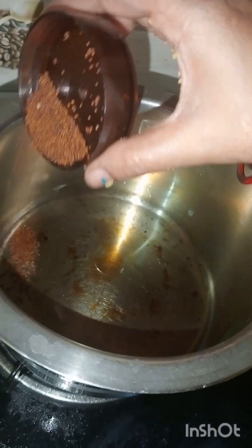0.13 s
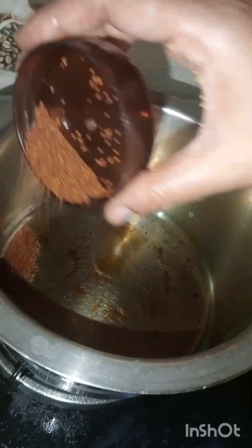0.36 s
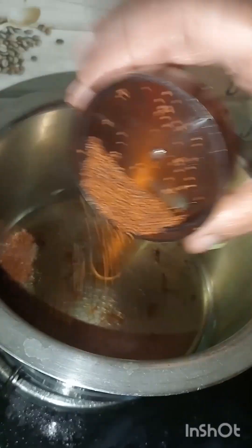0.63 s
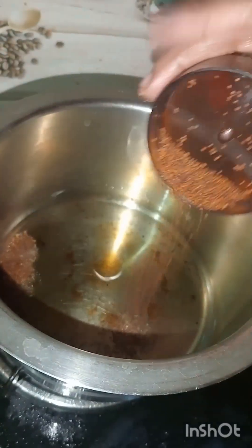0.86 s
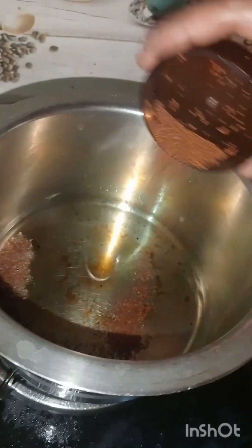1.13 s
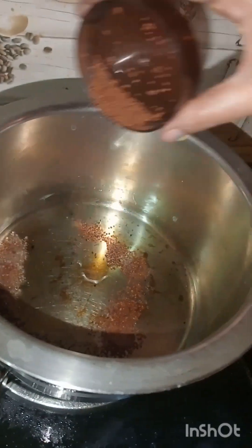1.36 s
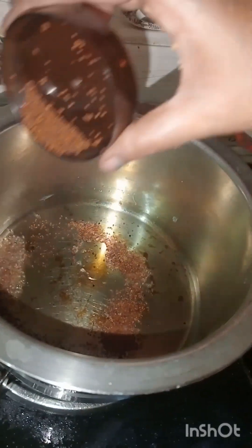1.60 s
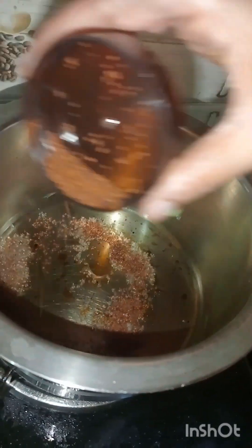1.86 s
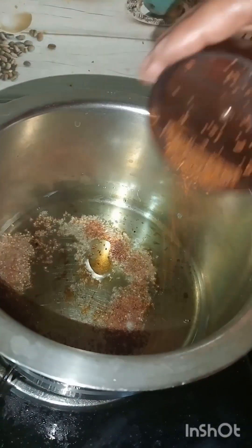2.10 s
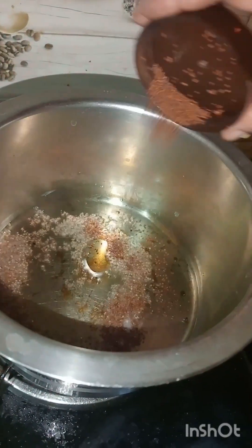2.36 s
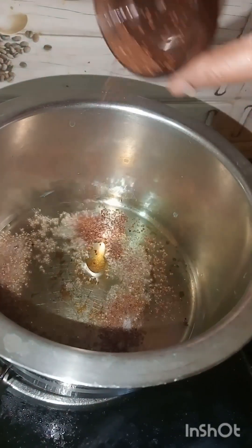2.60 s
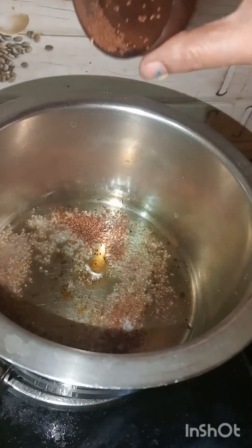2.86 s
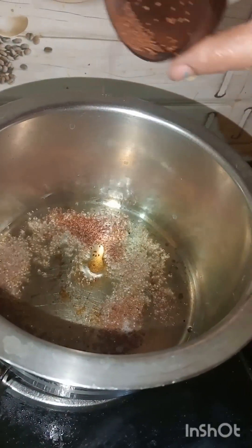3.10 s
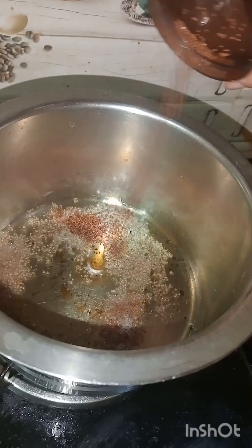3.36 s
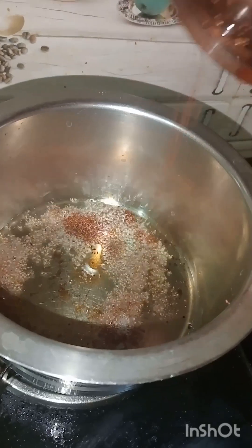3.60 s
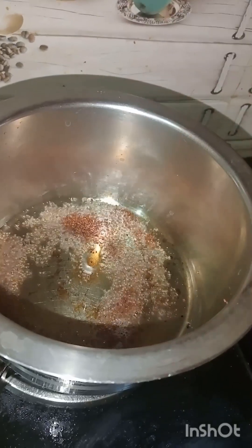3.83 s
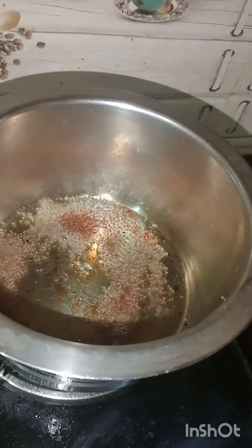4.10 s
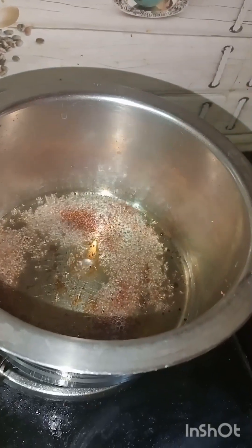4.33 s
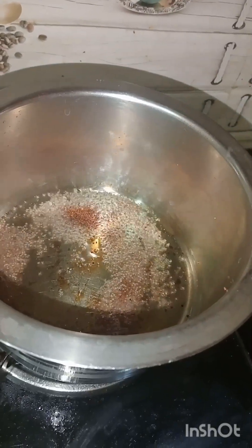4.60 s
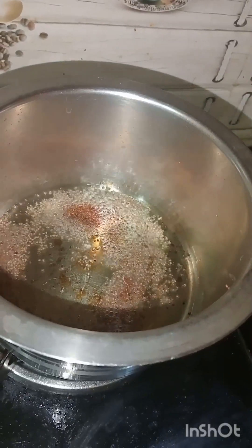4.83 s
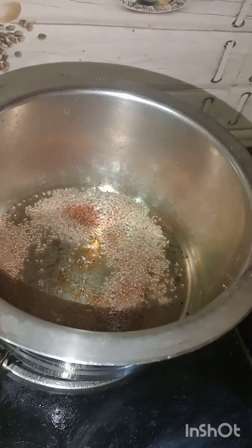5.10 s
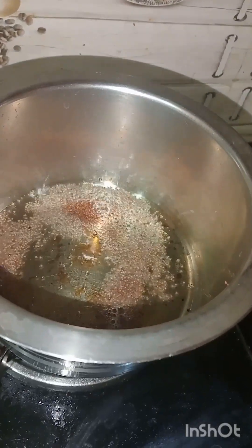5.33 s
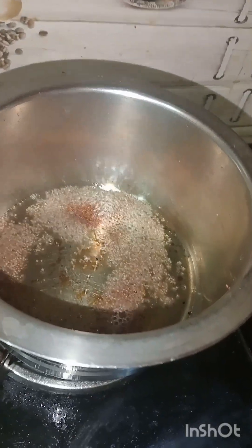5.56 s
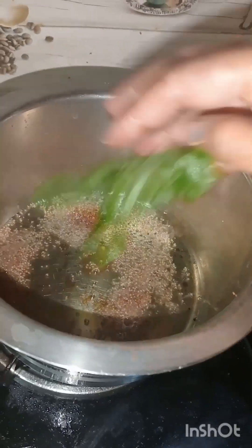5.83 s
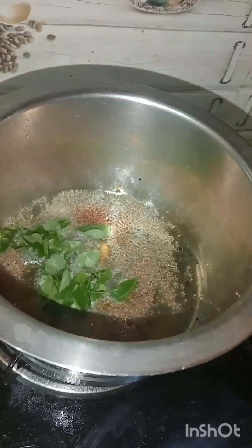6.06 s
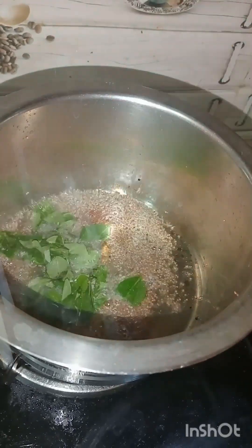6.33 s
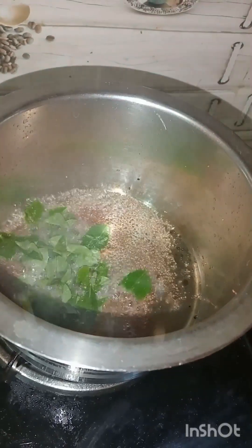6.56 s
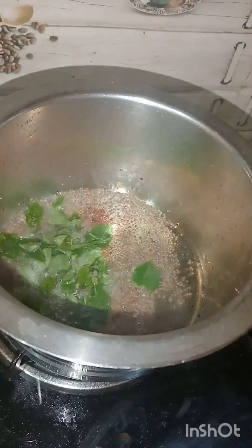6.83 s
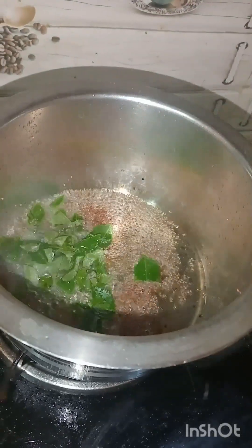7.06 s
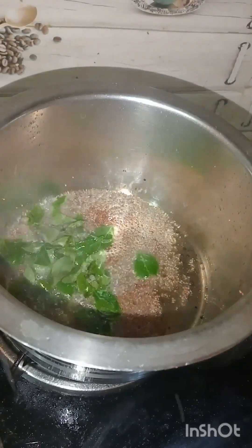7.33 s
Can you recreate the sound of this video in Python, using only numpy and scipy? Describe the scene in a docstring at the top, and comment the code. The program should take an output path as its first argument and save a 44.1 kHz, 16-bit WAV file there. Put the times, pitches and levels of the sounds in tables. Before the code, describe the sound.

Close over a deep steel pot in a kitchen, small seeds rustle and tick in a shaken bowl as they are poured into hot oil. Sparse pops soon become a rapid, sharp crackle over fine fizzing, some with low thumps. The bowl knocks on the counter midway. Near six seconds wet leaves slap in, and a loud dense sizzle with hard spitting takes over to the end. Bright, close phone microphone.

```python
"""A kitchen, close over a deep steel pot: seeds fizz and pop in hot oil, then wet leaves slap in and sizzle densely.
Steam bursts are puffs of noise at random moments; sizzle, gurgle and cracks ring the pot, fizz and hiss the
microphone port. Seeds rustle and patter in a small bowl as dense ticks, and the bowl knocks on the counter.
Low thumps under some of the pops are a sharp dip, a slow lobe and a short slap; one soft tone glides up.
Coloured noise and an unsteady low drone lie underneath."""
import sys
import numpy as np
from scipy import signal
from scipy.fft import rfft, irfft
from scipy.io import wavfile
from scipy.ndimage import uniform_filter1d

SR = 44100
rng = np.random.default_rng(int(sys.argv[2]) if len(sys.argv) > 2 else 0)


def gain_from_db(level_db):
    """Convert decibel levels to linear amplitude factors (20 dB per decade)."""
    decades = np.asarray(level_db, float) / 20
    return 10 ** decades


def unload_wav(signal):
    """Save mono or channel-first audio to the path in sys.argv[1] as 16-bit WAV at rate SR, clipped to [-1, 1]."""
    wavfile.write(
        sys.argv[1],
        SR,
        np.round(np.clip(np.atleast_2d(signal).T, -1, 1) * 32767).astype(np.int16),
    )


N = 328104

# colour of the kitchen air and burner noise: f/Hz, relative level per Hz/dB
KITCHEN_COLOUR = [(18, -46), (30, -3), (108, 6.5), (325, 2.5), (411, 2.5), (720, -6), (976, 0), (2430, 0),
                  (7120, -0.5), (8000, -6), (10400, -38), (17600, -120)]
# swells of the low drone: middle t/s, half length/s, level/dB
DRONE_SWELLS = [(.05, 0.13, -54), (2.2, 0.23, -56), (4.5, 0.28, -54.5), (6.5, 0.69, -47.5), (7.2, .15, -55)]
# bowl knocking on the counter: t/s, level/dB, clatter decay/s, upper modes against the low one/dB
BOWL_KNOCKS = [(4.4318, -21.5, 0.012, -10), (4.6094, -32.5, 0.014, 10), (4.677, -32, 0.02, 7.5),
               (4.717, -33.5, 0.036, 2.5)]
# modes of the knocked bowl, lowest first: f/Hz, width/Hz, level/dB
BOWL_MODES = [(1450, 55, 4), (2350, 150, -4), (2560, 140, -1), (6000, 95, -2)]
# shakes of the seed bowl: middle t/s, half length/s, patter level/dB, low rustle level/dB, high rustle level/dB
BOWL_SHAKES = [(.06, 0.17, -43, -49, -70), (.27, 0.093, -39.5, -47, -61), (.45, 0.15, -42, -44.5, -47.5),
               (.64, .1, -40.5, -50, -53), (.78, .1, -48, -47, -66), (.94, 0.44, -41, -52, -52),
               (1.37, 0.12, -36, -43.5, -44), (1.72, 0.063, -36, -50, -52), (2.12, 0.74, -43, -47.5, -50),
               (2.36, 0.32, -42, -52, -39), (2.9, 0.21, -38, -46.5, -44.5), (3.02, 0.11, -45, -67, -40)]
# resonances in the hollow of the seed bowl: f/Hz, width/Hz, level/dB
BOWL_HOLLOW = [(2100, 930, 5), (2570, 59, 3)]
# resonances of its rim: f/Hz, width/Hz, level/dB
BOWL_RIM = [(4860, 970, -7), (5450, 73, 3.5)]
# low thumps under some of the pops: t/s, level/dB
THUMPS = [(2.673, -26), (2.996, -31), (3.203, -28.5), (3.237, -37), (3.472, -24.5), (3.483, -20),
          (3.553, -34), (3.608, -31), (3.692, -23.5), (3.921, -30.5), (4.065, -30.5), (4.152, -30),
          (4.299, -26.5), (4.312, -22), (4.357, -28.5), (4.503, -23), (4.909, -30.5), (5.053, -38),
          (5.177, -33), (5.265, -26.5), (5.348, -27.5), (5.377, -32), (5.417, -34), (5.435, -24.5),
          (5.526, -24.5), (5.739, -25), (5.768, -36), (5.788, -32.5), (5.844, -39), (5.862, -34),
          (6.047, -20.5), (7.087, -29)]
# seeds frying between the pops: t/s, fine fizz level/dB, coarse sizzle level/dB
SEED_FRY = [(0.0, -57, -54), (0.45, -57, -52.5), (0.89, -44.5, -62.5), (1.25, -53.5, -57.5),
            (1.8, -45.5, -47), (2.3, -43.5, -45.5), (3.1, -42, -50.5), (3.61, -37.5, -44.5),
            (3.96, -44, -47), (4.23, -35.5, -44.5), (4.53, -38, -38.5), (4.75, -47, -46), (5.0, -41.5, -44),
            (5.4, -36.5, -47), (5.75, -47, -56.5), (6.03, -31.5, -34.5)]
# leaves in the oil; rows for fizz, sizzle, gurgle: lasting level/dB, level at first against it/dB
LEAF_FRY = [(-31.5, -20), (-24.5, 4.5), (-43.5, 10)]
# seeds bursting and drops spitting: t/s, level/dB, crack against it/dB, crack f/Hz, t60 of the spattering/s
SEED_POPS = [(0.6797, -19, -39, 3420, 0.12), (0.7924, -34, -25, 2480, 0.12), (0.8762, -33, -22, 5450, 0.12),
             (1.1617, -28.5, -18, 4870, 0.14), (1.3282, -28, -14, 5310, 0.12),
             (1.4792, -21, -16.5, 2630, 0.13), (1.5174, -22.5, -16, 5290, 0.11),
             (1.62, -25.5, -9, 4430, 0.096), (1.6671, -14, -11.5, 2480, 0.11),
             (1.6892, -10.5, -19, 4060, 0.098), (1.7245, -17.5, -11.5, 4050, 0.1),
             (1.7574, -11.5, -7, 6260, 0.092), (1.7964, -7, -10.5, 4040, 0.18),
             (1.855, -17, -16, 4510, 0.15), (1.925, -23, -14, 5450, 0.11), (1.9642, -33, -6, 5450, 0.12),
             (1.9814, -21.5, -21, 5320, 0.12), (2.0091, -19.5, -11, 5170, 0.12),
             (2.0618, -18, -28, 6170, 0.13), (2.1094, -12, -14, 5650, 0.16),
             (2.1605, -7, -12.5, 6040, 0.11), (2.2543, -13.5, -28, 4160, 0.12),
             (2.2773, -4.5, -16.5, 3260, 0.08), (2.3407, -6, -8.5, 4860, 0.18),
             (2.3761, -9, -7.5, 4570, 0.17), (2.4646, -23, -6.5, 5900, 0.14),
             (2.5265, -25, -18, 5320, 0.11), (2.5764, -19, -21, 5500, 0.13), (2.5937, -17, -15, 6160, 0.21),
             (2.6302, -10.5, -16, 3870, 0.14), (2.6633, -6, -16.5, 2630, 0.12),
             (2.8213, -14, -16, 5860, 0.12), (2.8574, -22, -11, 5590, 0.12), (2.886, -23, -4.5, 6400, 0.12),
             (2.9, -17, -20, 4720, 0.12), (2.9206, -10.5, -10.5, 5800, 0.11),
             (2.9714, -4.5, -14.5, 6160, 0.098), (2.9954, -11, -15, 5370, 0.081),
             (3.0328, -5, -17, 4010, 0.15), (3.126, -29, -23, 4030, 0.12), (3.151, -36, -15, 6150, 0.12),
             (3.176, -14.5, -13, 4800, 0.12), (3.1979, -9.5, -16, 6200, 0.13),
             (3.2197, -8.5, -14.5, 6370, 0.24), (3.2633, -8.5, -11, 2620, 0.11),
             (3.4007, -5, -11.5, 5170, 0.17), (3.4509, -6.5, -14, 5030, 0.26),
             (3.4792, -4, -13.5, 3200, 0.068), (3.5511, -9.5, -13.5, 5150, 0.1),
             (3.608, -6, -12.5, 5000, 0.15), (3.669, -19.5, -12.5, 5300, 0.13),
             (3.6905, -6.5, -18, 4800, 0.11), (3.7288, -15, -7, 5230, 0.14), (3.7498, -8, -15, 4890, 0.12),
             (3.8058, -15.5, -5.5, 4100, 0.082), (3.8484, -26, -12, 4060, 0.12),
             (3.8864, -10, -13.5, 4240, 0.063), (3.9197, -7, -17, 2620, 0.1), (3.9977, -9, -7, 5000, 0.12),
             (4.046, -6, -15, 4050, 0.35), (4.1105, -8.5, -14.5, 2820, 0.12),
             (4.1498, -2.5, -14.5, 5100, 0.1), (4.2167, -2, -19, 4830, 0.14),
             (4.2718, -18, -12.5, 4000, 0.12), (4.296, -6, -17, 3250, 0.15),
             (4.3564, -6.5, -17, 3240, 0.064), (4.3863, -9, -14.5, 4010, 0.11),
             (4.4246, -3, -9.5, 5730, 0.1), (4.4525, -10, -13, 5170, 0.084),
             (4.5019, -2.5, -15.5, 2500, 0.12), (4.5393, -11.5, -13, 4060, 0.16),
             (4.6072, -8, -8, 6090, 0.26), (4.6586, -13.5, -10, 5730, 0.12),
             (4.675, -11.5, -5.5, 2680, 0.15), (4.715, -2, -12, 6200, 0.098),
             (4.8162, -28, -21, 6150, 0.12), (4.8676, -14, -11.5, 5300, 0.08),
             (4.907, -5.5, -14, 3260, 0.12), (4.9273, -5, -18, 3250, 0.21), (4.9688, -16, -8.5, 4970, 0.12),
             (5.0508, -5.5, -13.5, 3260, 0.11), (5.111, -15, -15.5, 5100, 0.1),
             (5.128, -1.5, -13.5, 5000, 0.16), (5.1705, -6.5, -13.5, 6400, 0.18),
             (5.2408, -33, -30, 5370, 0.11), (5.265, -6.5, -18, 4040, 0.12),
             (5.316, -8.5, -15.5, 4020, 0.13), (5.346, -7, -16, 3300, 0.076), (5.3764, -5, -20, 2890, 0.16),
             (5.415, -13.5, -13, 3280, 0.11), (5.4356, -5, -15.5, 6400, 0.12),
             (5.492, -13, -17, 4070, 0.36), (5.5274, -5, -15, 3270, 0.14), (5.591, -4, -17, 3940, 0.16),
             (5.6298, -12.5, -16, 4000, 0.21), (5.7387, -4.5, -20, 3260, 0.075),
             (5.7653, -14, -17, 4020, 0.12), (5.7865, -11, -18, 4050, 0.11), (5.8416, -3, -16.5, 5100, 0.1),
             (5.8606, -9.5, -13, 4970, 0.12), (5.9172, 0, -14, 5060, 0.058), (5.9496, -9, -16, 4100, 0.084),
             (6.004, -12, -14.5, 3940, 0.15)]
# the loudest spits of the wet leaves: t/s, level/dB, crack f/Hz
LEAF_SPITS = [(6.0485, -15, 3250), (6.0623, -8, 3900), (6.0818, -1, 2910), (6.1128, 1.5, 3940),
              (6.1523, -5, 3760), (6.1814, -4, 4650), (6.2132, -5, 2930), (6.2327, -2, 3220),
              (6.2509, 0, 3300), (6.2986, -13, 3240), (6.3175, -9, 2930), (6.3387, -6, 3220),
              (6.3539, -7, 2550), (6.3807, -6.5, 2450), (6.406, -11, 2450), (6.4665, -7, 3000),
              (6.4867, -23, 4100), (6.5084, -7.5, 3400), (6.5419, -21, 2440), (6.5558, -9, 3030),
              (6.5902, -6, 2470), (6.637, -19, 3190), (6.6895, -8, 3450), (6.7183, -16, 3400),
              (6.7393, -5, 2500), (6.7589, -6, 5180), (6.7962, -12.5, 3000), (6.8486, -0.5, 2880),
              (6.9075, -2.5, 5600), (6.9458, -9, 2670), (6.9658, -6.5, 2510), (6.9962, -11, 2570),
              (7.0242, -7.5, 3000), (7.1154, -1, 5800), (7.1715, -18, 3230), (7.1883, -18, 2450),
              (7.2105, -2.5, 4140), (7.2314, -5.5, 3400), (7.2922, -16, 2460), (7.303, -13, 4100),
              (7.3687, -14, 3180), (7.381, -7.5, 2960)]
# resonances of the pot, its air and walls: f/Hz, width/Hz, level/dB
POT_MODES = [(566.4, 14, 5.5), (756, 127, 10), (1370, 61, 6.5), (1586, 122, 10), (1942, 44, 3.5),
             (2450, 81, 2.5), (2910, 30, -9), (3260, 275, -3.5), (3760, 43, -26), (4070, 123, -1),
             (5000, 1780, -1.5), (5950, 460, -11.5)]
# resonances of the microphone port: f/Hz, width/Hz, level/dB
MIC_PORT = [(9730, 530, -71), (9760, 390, 0.5), (10100, 4800, -4)]

KITCHEN_DB = -48
DRONE_HZ, OCTAVE_DB, DRONE_REST_DB = 154, -8.5, -66
COO_MIDDLE_S, COO_LENGTH_S, COO_DB = 4.255, 0.09, -46
COO_FROM_HZ, COO_TO_HZ, COO_UPPER_RATIO = 265, 320, 1.6
LANDING_DB, LANDING_DECAY_S = -20, 0.0044
SLAP_DB = -0.5  # against the dip and lobe of a thump
SEED_GURGLE_DB = -63
LEAVES_S, LEAVES_RISE_S, LEAVES_SETTLE_S = 6.05, 0.031, 0.37
SPIT_CRACK_DB, SPIT_T60_S = -8.5, 0.12
BRIGHT_FROM_S, EARLY_DULL = 2.55, 0.45  # earlier pops get this share less of the top band in their hiss
ROOM_T60_S, ROOM_DB = 0.14, -10
TOP_HZ = 15400


def unit(x):
    """Scale to rms 1."""
    return x / np.sqrt(np.mean(x ** 2))


def band(x, lo_hz, hi_hz, order=2):
    """Band-pass, its upper edge kept below the Nyquist limit."""
    edges = [lo_hz, min(hi_hz, 0.45 * SR)]
    return signal.sosfilt(signal.butter(order, edges, "bandpass", fs=SR, output="sos"), x)


def resonate(x, peaks, direct_db):
    """Direct sound plus one resonance for each (Hz, width, dB); white noise keeps its level."""
    def through(v):
        rings = (gain_from_db(db) * signal.lfilter(*signal.iirpeak(hz, hz / width, fs=SR), v) for hz, width, db in peaks)
        return gain_from_db(direct_db) * v + sum(rings)
    return through(x) / np.linalg.norm(through(signal.unit_impulse(8192)))


def curve(rows):
    """Interpolate the columns of a timed table, one value a sample."""
    s, *columns = np.transpose(rows)
    return [np.interp(np.arange(N) / SR, s, column) for column in columns]


def swells(rows):
    """Smooth humps from (middle, half length, dB, ..), summed in power; one gain curve for each dB column."""
    t = np.arange(N) / SR
    power = 0
    for s, half_length, *db in rows:
        hump = np.cos(np.pi * np.clip((t - s) / half_length, -1, 1) / 2)
        power = power + np.outer(gain_from_db(np.array(db)), hump) ** 2
    return np.sqrt(power)


def walk(rate, size=N):
    """Random levels, rate a second, with slewed steps; spread near 1."""
    hold = int(SR / rate)
    levels = np.repeat(rng.standard_normal(size // hold + 1), hold)
    return 1.46 * uniform_filter1d(levels, hold)[:size]


def add(out, s, sound):
    """Mix a sound in at a time."""
    i = int(s * SR)
    out[i:i + len(sound)] += sound[:N - i]


def kitchen():
    """Smooth air and burner noise: white noise coloured in the spectrum."""
    hz, db = np.transpose(KITCHEN_COLOUR)
    bins_hz = np.arange(1, N // 2 + 2) * SR / N
    colour = gain_from_db(np.interp(np.log(bins_hz), np.log(hz), db))
    air = unit(irfft(rfft(rng.standard_normal(N)) * colour, N))
    return air * gain_from_db(KITCHEN_DB + 0.5 * walk(4.3))


def drone():
    """A soft tone of wandering pitch and level, with its octave, swelling now and then."""
    phase = 2 * np.pi * np.cumsum(DRONE_HZ * (1 + 0.02 * walk(11))) / SR
    tone = np.sin(phase) + gain_from_db(OCTAVE_DB + 2.0 * walk(6.7)) * np.sin(2 * phase)
    gain = np.hypot(gain_from_db(DRONE_REST_DB), swells(DRONE_SWELLS)[0])
    return gain * gain_from_db(3.8 * walk(12)) * tone


def coo():
    """A short fluttering soft tone gliding upward, with a fainter tone above."""
    share = np.clip((np.arange(N) / SR - COO_MIDDLE_S) / COO_LENGTH_S + 0.5, 0, 1)
    phase = 2 * np.pi * np.cumsum(COO_FROM_HZ + (COO_TO_HZ - COO_FROM_HZ) * share) / SR
    tones = np.sin(phase) + 0.4 * np.sin(COO_UPPER_RATIO * phase)
    return gain_from_db(COO_DB + 3.5 * walk(90)) * np.sin(np.pi * share) * tones


def bowl():
    """A knock is a decaying clatter of noise; it rings the low mode, and the upper ones more or less."""
    low, upper = np.zeros((2, N))
    t = np.arange(int(0.1 * SR)) / SR
    for s, db, decay_s, upper_db in BOWL_KNOCKS:
        blow = gain_from_db(db + 5.5) * rng.standard_normal(len(t)) * np.exp(-t / decay_s)
        add(low, s - 0.003, blow)
        add(upper, s - 0.003, gain_from_db(upper_db) * blow)
    low_ring = resonate(low, BOWL_MODES[:1], direct_db=-32.5)
    return low_ring + resonate(upper, BOWL_MODES[1:], direct_db=-23.0)


def bubbles(rate, scatter_db, tail_s, steady):
    """Tiny bursts at random moments, sizes widely scattered, each a short puff of noise over a steady bed."""
    starts = (rng.random(N) < rate / SR) * gain_from_db(scatter_db * rng.exponential(size=N))
    puffs = signal.lfilter([1], [1, -np.exp(-1 / (tail_s * SR))], starts)
    return unit(rng.standard_normal(N) * (steady + unit(puffs)))


def crackle(lo_hz, hi_hz, count, rate, scatter_db, tail_s, steady):
    """Each of several adjoining bands has bursts at its own moments and its own wandering level."""
    edges = np.geomspace(lo_hz, hi_hz, count + 1)
    total = np.zeros(N)
    for lo, hi in zip(edges, edges[1:]):
        bursts = bubbles(rate, scatter_db, tail_s, steady) * gain_from_db(3.24 * walk(22))
        total += band(bursts, lo, hi, order=1)
    return unit(total)


def pouring():
    """Dense seed ticks ring the hollow and the rim of the small bowl, one swell for each shake."""
    patter_gain, low_gain, high_gain = swells(BOWL_SHAKES)
    ticks = bubbles(1700, 1.9, 0.00052, 1.)
    low = unit(resonate(ticks, BOWL_HOLLOW, direct_db=-26)) * low_gain
    high = unit(resonate(ticks, BOWL_RIM, direct_db=-36)) * high_gain
    patter = crackle(8540, 10720, count=10, rate=150.0, scatter_db=4.0, tail_s=0.0095, steady=0.59)
    return low + high + patter * patter_gain


def thumps():
    """Low thumps: a sharp dip swings back in one slow lobe, and a short slap of noise rides on it."""
    out, t = np.zeros(N), np.arange(int(0.06 * SR)) / SR
    lobe = np.sin(2 * np.pi * 100 * t) * np.exp(-t / 0.0044)
    dip = 0.65 * np.exp(-((t - 0.0006) / 0.00037) ** 2)
    for s, db in THUMPS:
        slap = unit(band(rng.standard_normal(len(t)), 185, 1970, order=1)) * np.exp(-t / 0.0027)
        add(out, s + 0.00094, gain_from_db(db) * (lobe - dip + gain_from_db(SLAP_DB) * slap))
    return out


def landing():
    """The handful of leaves slaps the oil: one short decaying burst of noise."""
    out, t = np.zeros(N), np.arange(int(0.04 * SR)) / SR
    slap = unit(band(rng.standard_normal(len(t)), 200, 2200, order=1)) * np.exp(-t / LANDING_DECAY_S)
    add(out, LEAVES_S - 0.002, slap)
    return gain_from_db(LANDING_DB) * out


def boil():
    """Gains as the leaves join the seeds: sizzle and gurgle strongest at first, the high fizz growing later."""
    since = np.maximum(np.arange(N) / SR - LEAVES_S, 0)
    share = 1 - np.exp(-since / LEAVES_RISE_S)
    early = np.exp(-(since / LEAVES_SETTLE_S) ** 2)
    seeds = [*curve(SEED_FRY), SEED_GURGLE_DB + 0.5 * walk(3)]
    return [np.hypot(gain_from_db(seed_db), share * gain_from_db(last_db + early_db * early))
            for seed_db, (last_db, early_db) in zip(seeds, LEAF_FRY)]


def frying():
    """Small bubbles fizz high, larger ones spit, and low bands gurgle; gives treble and body apart."""
    fine_gain, coarse_gain, deep_gain = boil()
    fizz = crackle(8380, 12370, count=6, rate=160.0, scatter_db=5.0, tail_s=0.0037, steady=0.32)
    spray = unit(band(bubbles(1900, 2.0, 0.0018, 1.), 3700, 21000))
    fine = (fizz + 0.37 * spray) * fine_gain * gain_from_db(0.75 * walk(25))
    large = bubbles(330, 2.4, 0.0016, 0.2) * gain_from_db(1.3 * walk(40))
    spits = crackle(2430, 4170, count=5, rate=60., scatter_db=2.5, tail_s=0.0044, steady=0.25)
    coarse = (unit(band(large, 1940, 10100)) + 0.7 * spits) * coarse_gain
    gurgle = (large + 1.02 * rng.standard_normal(N)) * gain_from_db(2.0 * walk(20))
    deep = unit(band(gurgle, 530, 887, order=3)) + 0.25 * unit(band(gurgle, 283, 336))
    return fine, coarse + deep * deep_gain


def pops():
    """Each pop is a ragged spurt of steam, pitched by the size of its bubble, with a spattering tail."""
    hiss, crack = np.zeros((2, N))
    t = np.arange(int(0.15 * SR)) / SR
    rise = np.minimum(t / 0.00048, 1)
    spits = [(s, db, SPIT_CRACK_DB, hz, SPIT_T60_S) for s, db, hz in LEAF_SPITS]
    for s, level_db, crack_db, crack_hz, t60 in [*SEED_POPS, *spits]:
        lag, size = rng.random(2)
        tail = gain_from_db(-60 * t / t60)
        # a weaker second spit a moment later
        late = t - 0.008 - 0.016 * lag
        again = 0.22 * size ** 2 * (late > 0) * np.exp(-np.abs(late) / 0.0027)
        envelope = rise * (np.exp(-t / 0.0038) + again + 0.27 * tail)
        shape = gain_from_db(level_db) * envelope * gain_from_db(2.46 * walk(900, size=len(t)))
        steam = rng.standard_normal(len(t))
        # what the crack does not take goes into the hiss
        hiss_share = np.sqrt(np.clip(1 - 3.85 * gain_from_db(crack_db) ** 2, 0.03, 1))
        top = 1.27 * (1 - EARLY_DULL * (s < BRIGHT_FROM_S))
        spray = unit(band(steam, 6470, 12030) + top * band(steam, 9700, 20000))
        add(hiss, s, gain_from_db(-6.5) * hiss_share * shape * spray)
        spurt = 0.07 * band(steam, 590, 910) + 1.47 * band(steam, 2265, 5320, order=4)
        spurt += band(steam, crack_hz / 1.32, crack_hz * 1.09)
        spurt += 3.5 * band(steam, crack_hz / 1.072, crack_hz * 1.106, order=1)
        add(crack, s, gain_from_db(crack_db) * shape * unit(spurt))
    return hiss, crack


def room(x):
    """Short diffuse tail of a hard-walled kitchen: convolution with decaying noise."""
    t = np.arange(int(0.4 * SR)) / SR
    tail = rng.standard_normal(len(t)) * gain_from_db(-60 * t / ROOM_T60_S) * np.minimum(t / 0.00073, 1)
    return x + gain_from_db(ROOM_DB) * signal.fftconvolve(x, tail / np.linalg.norm(tail))[:N]


def scene():
    """Pot, port and bowl sounds share the room; thumps, drone and kitchen noise are added dry."""
    fine, coarse = frying()
    hiss, crack = pops()
    pot = resonate(coarse + crack, POT_MODES, direct_db=-4)
    treble = resonate(fine + hiss, MIC_PORT, direct_db=-15.0)
    in_room = room(pot + treble + bowl() + pouring() + landing() + coo())
    return (in_room + thumps() + drone() + kitchen())[None]


def band_limit(x):
    """A steep low-pass at the top of the band."""
    return signal.sosfilt(signal.butter(12, 16640, fs=SR, output="sos"), x)


def record(dry):
    """The phone rounds the loudest peaks, cuts the deepest bass and removes the very top."""
    x = np.tanh(0.98 * dry) / 1.551
    x = signal.sosfilt(signal.butter(3, 55, "highpass", fs=SR, output="sos"), x)
    x = signal.sosfilt(signal.ellip(6, 0.3, 20, TOP_HZ, fs=SR, output="sos"), x)
    return band_limit(x)


dry = scene()
out = record(dry)
unload_wav(out)
```